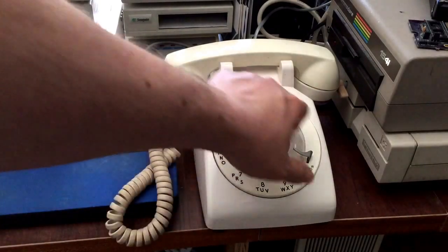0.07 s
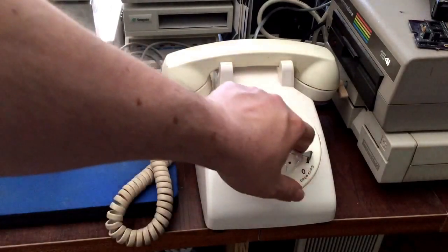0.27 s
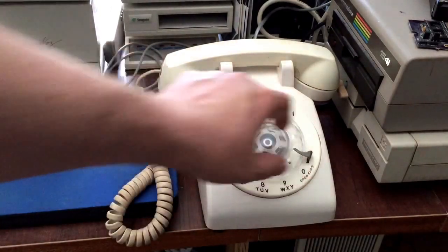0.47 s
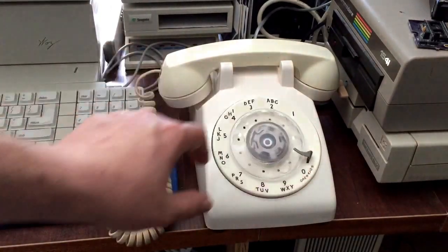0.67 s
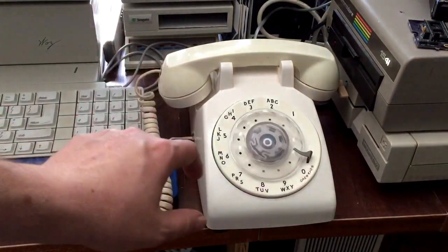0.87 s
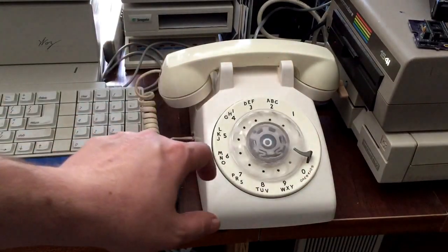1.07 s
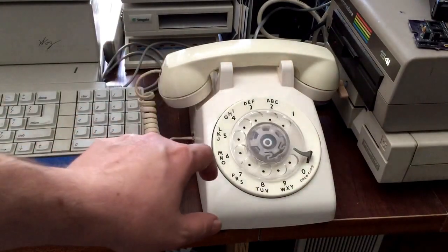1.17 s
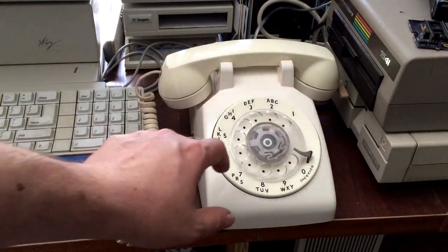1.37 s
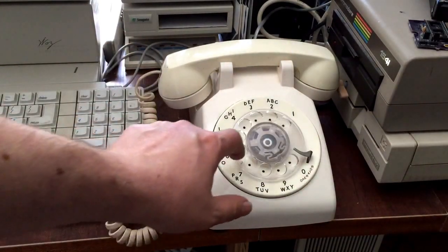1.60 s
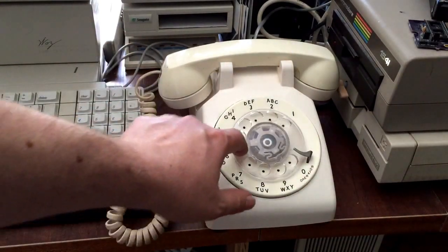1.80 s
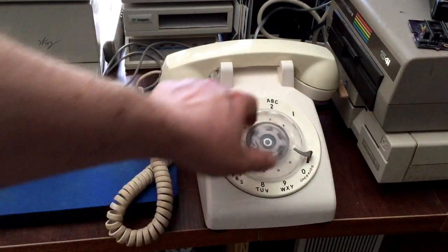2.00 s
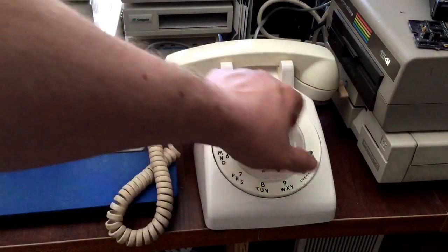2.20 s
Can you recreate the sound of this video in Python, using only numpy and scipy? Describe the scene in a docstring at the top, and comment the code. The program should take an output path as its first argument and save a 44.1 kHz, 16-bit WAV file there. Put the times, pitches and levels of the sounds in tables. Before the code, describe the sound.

Close up in a small room with soft equipment hum, an old phone's dial is pulled round, clicks, whirrs back ticking and clacks home, then after a pause is clicked and wound again.

```python
"""A rotary telephone on a desk in a small room: a finger winds the dial to its stop and lets go.
The dial runs back on chattering gears, with a humming governor and ticking contacts, and clacks home.
The finger then finds the next hole and winds again, over a soft equipment hum and room air.
Rasps, clicks and clacks are filtered noise, the ringing parts are decaying sines,
the governor and equipment are wavering sines, and a short noise tail makes the room."""
import sys
import numpy as np
from scipy import signal
from scipy.fft import rfft, irfft, next_fast_len
from scipy.io import wavfile
from scipy.ndimage import map_coordinates

SR = 44100
rng = np.random.default_rng(int(sys.argv[2]) if len(sys.argv) > 2 else 0)


def generate_wav(signal):
    """Clip the signal to [-1, 1] and save it as 16-bit WAV at the path in sys.argv[1]."""
    frames = np.transpose(np.atleast_2d(signal))
    scaled = np.clip(frames, -1, 1) * 32767
    pcm = np.round(scaled).astype(np.int16)
    wavfile.write(sys.argv[1], SR, pcm)


N = 99225

# finger and finger-wheel clicks, layer levels before the mix trims:
# (time [s], case level [dB], wheel level [dB], snap level [dB], wheel ring level [dB], hold [s])
FINGER_CLICKS = [(0.227, -40, -33.5, -26.5, -42, 0.0029), (0.2745, -48, -39.5, -32.5, -31.5, 0.0052),
                 (0.3395, -68, -55, -48, -41.5, 0.0014), (0.399, -55, -42, -44, -53, 0.0042),
                 (1.747, -60.5, -56.5, -59, -74, 0.0076), (1.842, -58.5, -61, -57, -76, 0.004),
                 (1.896, -62.5, -65, -53, -81, 0.0058), (1.952, -78, -42.5, -37.5, -39.5, 0.0034),
                 (1.9706, -44, -43, -47, -32.5, 0.0027), (2.017, -46.5, -52, -52.5, -53, 0.0043),
                 (2.066, -51, -49.5, -68, -70, 0.0029), (2.093, -40, -42, -53, -66, 0.0056)]
# bright spectrum shared by the leaf contacts and the skin hiss: (frequency [Hz], relative level [dB])
BRIGHT_COLOUR = [(500, -51), (4000, -4), (7300, -6.5), (9300, 5.5), (11000, -4.5), (13000, -3.5),
                 (15500, -17.5)]


def amp(db):
    """Decibels to gain."""
    return 10 ** (np.asarray(db) / 20)


def unit(x):
    """Scale to rms 1."""
    return x / np.sqrt(np.mean(x ** 2) + 1e-20)


def along(points, hz):
    """Interpolate (frequency [Hz], value) points on a log frequency axis."""
    f, v = np.transpose(points)
    return np.interp(np.log(hz + 1), np.log(f + 1), v)


def curve(rows, axis=1):
    """One column of a time table, interpolated per sample."""
    rows = np.array(rows)
    return np.interp(np.arange(N) / SR, rows[:, 0], rows[:, axis])


def stroke(rows, axis=1):
    """Gain of a movement from a level column in dB; silent before and after the table."""
    t = np.arange(N) / SR
    moving = (t >= rows[0][0]) * (t <= rows[-1][0])
    return amp(curve(rows, axis=axis)) * moving


def wobble(rate):
    """A smooth random curve, rate knots a second."""
    knots = rng.standard_normal(N // 8)
    return map_coordinates(knots, [np.arange(N) * rate / SR + 2], mode="wrap")


def coloured(x, points, size=4096):
    """Shape x with a causal minimum-phase filter of unit energy."""
    log_gain = np.log(amp(along(points, np.fft.rfftfreq(size, 1 / SR))))
    cepstrum = irfft(log_gain)
    # folding the cepstrum forward makes the filter causal
    cepstrum[1:size // 2] *= 2
    cepstrum[size // 2 + 1:] = 0
    response = irfft(np.exp(rfft(cepstrum)))
    return signal.fftconvolve(x, response / np.linalg.norm(response))[:N]


def bursts(rows, attack, t60, size=4096):
    """Noise bursts for (time [s], level [dB], hold [s]) rows; attack and t60 in seconds."""
    out, t = np.zeros(N + size), np.arange(size) / SR
    for start, db, hold in rows:
        release = amp(-60 * np.maximum(t - hold, 0) / t60)
        burst = rng.standard_normal(size) * (1 - np.exp(-t / attack)) * release
        # the level is the burst's energy spread over 5 ms
        burst = burst / np.linalg.norm(burst) * np.sqrt(.005 * SR)
        out[round(start * SR):][:size] += amp(db) * burst
    return out[:N]


def struck(blows, modes, attack):
    """Ring (frequency, level, t60) modes at (time, level, softness) blows; softness dims high modes."""
    out = np.zeros(N)
    for start, blow_db, softness in blows:
        t = np.arange(min(SR // 3, N - round(start * SR))) / SR
        ring = np.zeros(len(t))
        for hz, mode_db, t60 in modes:
            # softness is dB lost per kHz; each mode also varies at random by about 1 dB
            level = blow_db + mode_db - softness * hz / 1e3 + rng.normal(0, 1)
            ring += amp(level - 60 * t / t60) * np.sin(2 * np.pi * (hz * t + rng.random()))
        out[round(start * SR):][:len(t)] += ring * (1 - np.exp(-t / attack))
    return out


def teeth(rate_hz, scatter, spread_db, life_s, rub):
    """Gear teeth meet at an uneven rate around rate_hz, each a short scrape, over steady rubbing."""
    turns = np.cumsum(rate_hz * np.exp(scatter * wobble(90))) / SR
    strengths = amp(spread_db * np.clip(rng.standard_normal(N), -2, 2))
    hits = np.diff(np.floor(turns), prepend=0) * strengths
    force = unit(signal.lfilter([1], [1, -np.exp(-1 / (life_s * SR))], hits))
    return unit((force + rub) * rng.standard_normal(N))


def winding():
    """The wheel is pulled round against its spring and the gears rasp."""
    # pulls to the finger stop and for the next digit: (time [s], level [dB])
    first_pull = [(0, -48.5), (.07, -52), (.10, -48), (.224, -48), (.25, -72), (.3, -104)]
    second_pull = [(1.82, -76), (1.86, -65.5), (1.89, -70.5), (1.95, -48.5), (2.02, -54.5), (2.05, -57.5),
                   (2.11, -53), (2.3, -51.5)]
    # rasp spectrum: (frequency [Hz], relative level [dB])
    pull_colour = [(100, -64), (420, -27), (560, -3.5), (660, -11), (770, -5), (880, -10), (1040, 3.5),
                   (1160, -5), (1280, -12), (1550, -9), (1950, -27.5), (2600, -32), (3020, -7.5),
                   (3500, -18), (3950, -14.5), (4450, -17.5), (4850, -34), (5800, -19), (7600, -29.5),
                   (9500, -31), (15000, -44.5)]
    force = teeth(rate_hz=170, scatter=.3, spread_db=5, life_s=0.0025, rub=1.3)
    rasp = unit(coloured(force, pull_colour))
    return rasp * (stroke(first_pull) + stroke(second_pull))


def background():
    """Filtered noise for room air, and equipment hum as sines that waver in pitch and level."""
    # equipment hum lines: (centre frequency [Hz], level [dB], pitch waver [Hz])
    hum_lines = [(74.3, -74.5, 2), (121.4, -70, 0.78), (257.6, -78, 7.3), (309.2, -68, 1.82),
                 (323.6, -62.5, 1.07)]
    # room air spectrum: (frequency [Hz], relative level [dB])
    air_colour = [(20, -57), (38, -30), (70, -13), (100, -15.5), (150, -14.5), (200, -16.5), (280, -11),
                  (340, -8), (410, -25.5), (660, -21.5), (850, -23.5), (1500, -29), (3000, -33),
                  (8000, -40.5), (15000, -48.5)]
    air_db, hum_flutter = -61.5, .45
    t = np.arange(N) / SR
    hum = np.zeros(N)
    for hz, db, waver_hz in hum_lines:
        swell = 1 + hum_flutter * wobble(18)
        cycles = hz * t + np.cumsum(waver_hz * wobble(25.21)) / SR
        hum += amp(db) * unit(swell * np.sin(2 * np.pi * cycles))
    air = unit(coloured(rng.standard_normal(N), air_colour))
    return hum + amp(air_db) * air


def room(x):
    """The walls scatter x into a short diffuse tail, duller as it dies."""
    # reverberation: (frequency [Hz], t60 [s])
    decay_times = [(200, 0.39), (1000, 0.18), (4000, 0.15), (14000, 0.11)]
    hz, t, bins = signal.stft(rng.standard_normal(SR // 2), SR, nperseg=256)
    decay = amp(-60 * t / along(decay_times, hz)[:, None])
    tail = signal.istft(bins * decay, SR, nperseg=256)[1]
    tail = tail * (1 - np.exp(-np.arange(len(tail)) / SR / 0.0032))  # 3.2 ms onset
    return signal.fftconvolve(x, tail / np.linalg.norm(tail))[:N]


def finger_slides():
    """Skin rubs the rim of the hole: a faint noise hiss as the fingertip shifts."""
    # slides: (time [s], level [dB], hold [s])
    slides = [(.186, -53, 0.021), (1.99, -51, 0.031)]
    return coloured(bursts(slides, attack=0.0037, t60=0.033), BRIGHT_COLOUR)


def wheel_clicks():
    """Each click snaps, knocks in the plastic wheel and, more slowly, in the case."""
    # spectra of the three layers: (frequency [Hz], relative level [dB])
    case_colour = [(100, -40), (380, -15.5), (540, 6.5), (850, -13), (1060, 2), (1300, -10.5), (1600, -1.5),
                   (1900, -12), (2450, -5.5), (4000, -43), (15000, -51)]
    wheel_colour = [(900, -40), (2100, -38), (2450, -13.5), (2750, -13), (3030, -1.5), (3450, -2.5),
                    (3750, -7), (4300, -8.5), (4900, -17.5), (15000, -60)]
    snap_colour = [(2500, -33), (4500, -15), (5700, 7), (6600, 5.5), (7400, -4), (8600, 10.5), (9500, 5),
                   (11000, -4), (12000, -10), (15500, -16)]
    start, case_db, wheel_db, snap_db, _, hold = np.transpose(FINGER_CLICKS)
    case = coloured(bursts(zip(start, case_db, hold), attack=0.0097, t60=0.047), case_colour)
    wheel = coloured(bursts(zip(start, wheel_db, hold), attack=0.00015, t60=0.017), wheel_colour)
    snap = coloured(bursts(zip(start, snap_db, hold), attack=0.0018, t60=0.014), snap_colour)
    return amp(1.63) * case + amp(-1.55) * wheel + amp(-6.0) * snap


def ringing():
    """The wheel, the dial plate and the case ring briefly in their own modes after blows."""
    # resonances: (frequency [Hz], relative level [dB], t60 [s])
    wheel_modes = [(3016, 0.5, 0.037), (4090, -9.5, 0.016)]
    plate_modes = [(3230, -0.5, 0.068), (6600, -9, 0.04)]
    case_modes = [(534, 6, 0.096), (1070, -22, 0.065), (1160, -20, 0.036), (1487, 0.5, 0.15),
                  (1700, -1, 0.08), (2800, -2.5, 0.033), (3170, -11, 0.03), (3325, 0, 0.038),
                  (4007, -13, 0.025), (5380, -10, 0.03)]
    # blows: (time [s], level [dB], softness [dB lost per kHz])
    plate_blows = [(1.2372, -45, 0), (1.749, -48.5, -0.5)]
    case_blows = [(1.232, -43.5, 5.5), (1.7505, -39.5, 18), (2.0965, -52, 0.5)]
    wheel_blows = [(start, ring_db, 0) for start, _, _, _, ring_db, _ in FINGER_CLICKS]
    wheel = struck(wheel_blows, wheel_modes, attack=.001)
    plate = struck(plate_blows, plate_modes, attack=0.0008)
    case = struck(case_blows, case_modes, attack=0.0012)
    return wheel + plate + case


def running_back():
    """The gear train runs back: low chatter under a ratchet of short, ringing ticks."""
    # chatter before its mix trim: (time [s], level [dB])
    run_back = [(.35, -57), (.39, -64.5), (.405, -44), (.428, -52), (.46, -44), (.53, -47.5), (.71, -48),
                (1.228, -49.5), (1.245, -43)]
    # strong and weak gear ticks before the mix trims: (time [s], level [dB])
    gear_ticks = [(0.4566, -35), (0.4763, -47), (0.4848, -41), (0.5361, -50), (.5627, -64), (0.5837, -41.5),
                  (0.669, -53), (0.6901, -43), (0.718, -44), (0.741, -48), (0.7734, -49), (0.7946, -42.5),
                  (0.8326, -49), (0.8766, -40), (0.9008, -45.5), (0.9258, -37.5), (0.954, -49),
                  (1.005, -43.5), (1.033, -43.5), (1.058, -45), (1.07, -43), (1.0849, -35.5),
                  (1.1093, -50.5), (1.1406, -48), (1.1621, -47), (1.1912, -47), (1.2121, -40)]
    # chatter and knock spectra: (frequency [Hz], relative level [dB])
    gear_colour = [(30, -28), (200, -11), (420, -11.5), (520, 2.5), (730, -3), (850, -8), (1050, 5),
                   (1250, -6.5), (1520, 0.5), (1950, -12), (2500, -14), (3050, -13), (4200, -18),
                   (4900, -32), (6300, -24.5), (8000, -35), (9500, -26.5), (15000, -49)]
    knock_colour = [(100, -62), (400, -17.5), (700, 2), (1500, -2), (2100, -14), (3030, 7), (3550, -7),
                    (4350, -8), (4900, -15), (6200, -13.5), (9000, -42), (15000, -55)]
    # gear resonances: (frequency [Hz], relative level [dB], t60 [s])
    gear_modes = [(3076, 0, 0.014), (3530, -15, 0.0087), (4314, -7.5, 0.015)]
    force = teeth(rate_hz=86, scatter=.25, spread_db=4.5, life_s=0.007, rub=0.21)
    chatter = unit(coloured(force, gear_colour)) * stroke(run_back)
    tick_bursts = [(start, db, .002) for start, db in gear_ticks]
    knocks = coloured(bursts(tick_bursts, attack=0.000071, t60=0.021), knock_colour)
    pings = struck([(start, db, 0) for start, db in gear_ticks], gear_modes, attack=0.00056)
    return amp(-0.95) * chatter + amp(-4.5) * knocks + amp(3.0) * pings


def governor():
    """The spinning brake hums as a sine of wavering pitch and level while the dial runs back."""
    # brake, before its waver and flutter: (time [s], pitch [Hz], level [dB])
    brake = [(.44, 600, -60), (.52, 604, -51), (.55, 606, -47.5), (.7, 600, -47.5), (.96, 612, -47.5),
             (1.08, 611.3, -50), (1.12, 615, -43.5), (1.228, 612, -49.5), (1.245, 605, -79)]
    flutter_db = 2.1
    pitch = curve(brake) * (1 + 0.012 * wobble(60.26))
    flutter = amp(flutter_db * wobble(40.7) - 2.5)
    tone = np.sqrt(2) * np.sin(2 * np.pi * np.cumsum(pitch) / SR)
    return tone * flutter * stroke(brake, axis=2)


def contacts():
    """The leaf contacts open and close with short, bright noise ticks."""
    # contact ticks before the mix trim: (time [s], level [dB])
    contact_ticks = [(0.4463, -40), (0.4753, -45), (.493, -48), (0.595, -44), (0.602, -45.5), (0.646, -49),
                     (0.7002, -42.5), (0.7074, -40.5), (.756, -44.5), (0.8108, -42.5), (0.863, -46),
                     (0.919, -46.5), (0.924, -50.5), (0.965, -44.5), (1.022, -41.5), (1.0777, -40.5),
                     (1.084, -44.5), (1.1256, -49.5), (1.179, -42.5), (1.898, -57.5), (1.954, -70),
                     (2.097, -59.5)]
    tick_bursts = [(start, db, .003) for start, db in contact_ticks]
    return amp(-6.0) * coloured(bursts(tick_bursts, attack=0.00038, t60=0.018), BRIGHT_COLOUR)


def home_stop():
    """The dial strikes home and rebounds: a hard double clack, faint rattle, case thud and desk ring."""
    # strikes and rebounds before the mix trim: (time [s], level [dB])
    home_strikes = [(1.2332, -27), (1.2371, -27.5), (1.266, -53.5), (1.282, -54)]
    # the clack spreads into the case, before the mix trim: (time [s], level [dB], hold [s])
    case_thud = [(1.238, -39, 0.0048)]
    # clack and thud spectra: (frequency [Hz], relative level [dB])
    home_colour = [(200, -20), (500, -7), (900, -7), (1150, 5), (1350, -19.5), (1900, -14), (2500, -8),
                   (2800, 0), (3500, -0.5), (4030, 5), (4750, -10.5), (5450, -1), (6700, -7), (8300, -8),
                   (10800, -7.5), (13000, -18.5), (15000, -18)]
    thud_colour = [(120, -34.5), (260, 3), (480, 0.5), (1000, -6), (1750, -7.5), (6000, -49)]
    # the stop shakes the desk: (time [s], level [dB], softness [dB lost per kHz])
    desk_blows = [(1.242, -41, -2.5)]
    # desk resonances: (frequency [Hz], relative level [dB], t60 [s])
    desk_modes = [(180.3, -9.5, 0.17), (262.3, -1, .2)]
    strike_bursts = [(start, db, .0012) for start, db in home_strikes]
    clack = coloured(bursts(strike_bursts, attack=0.0001, t60=0.025), home_colour)
    thud = coloured(bursts(case_thud, attack=0.0027, t60=0.045), thud_colour)
    desk = struck(desk_blows, desk_modes, attack=0.0029)
    return amp(1.26) * clack + amp(2) * thud + desk


def scene():
    """The telephone in its room; clicks and rasp scatter off the walls, the tones stay dry."""
    room_db = -8.5
    clatter = winding() + finger_slides() + wheel_clicks()
    clatter = clatter + running_back() + contacts() + home_stop()
    tones = ringing() + governor()
    return (clatter + amp(room_db) * room(clatter) + tones + background())[None]


def record(dry):
    """Nothing is kept above the band limit."""
    top_hz = 15650
    size = next_fast_len(N + SR // 2)
    kept = np.fft.rfftfreq(size, 1 / SR) < top_hz
    return irfft(rfft(dry, size) * kept, size)[:, :N]


dry = scene()
out = record(dry)
generate_wav(out)
```